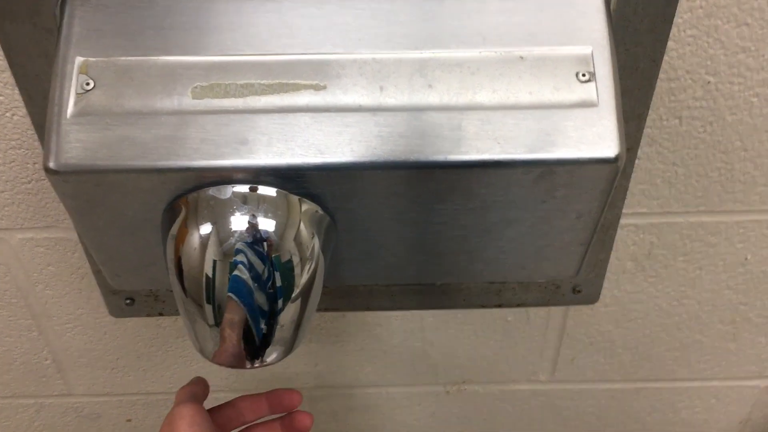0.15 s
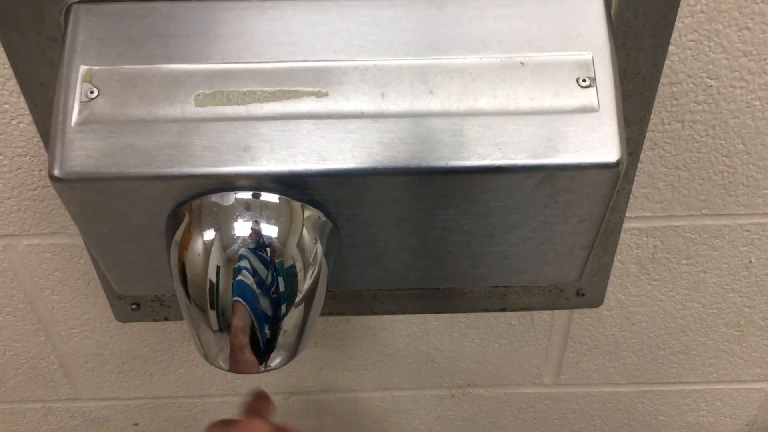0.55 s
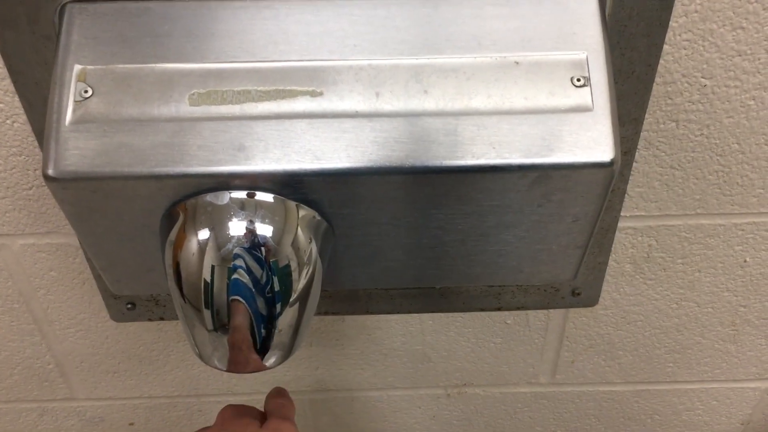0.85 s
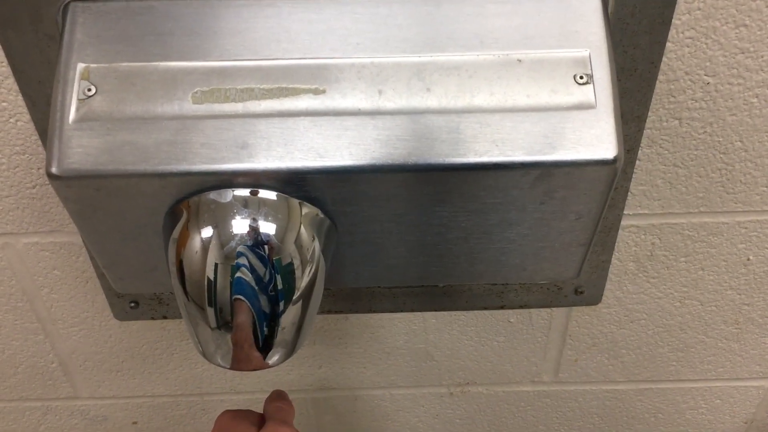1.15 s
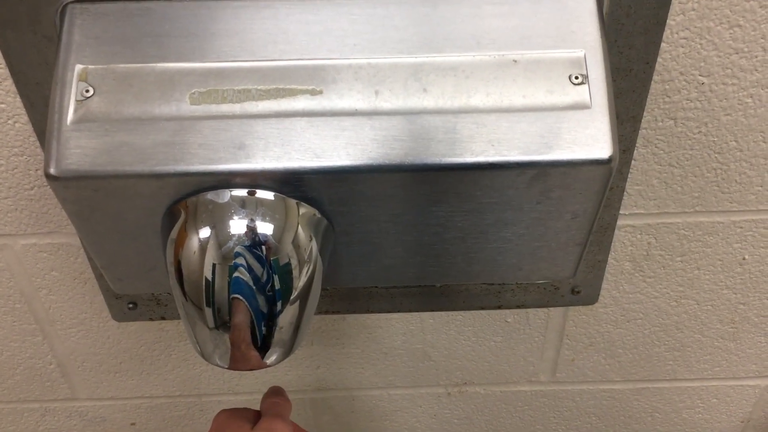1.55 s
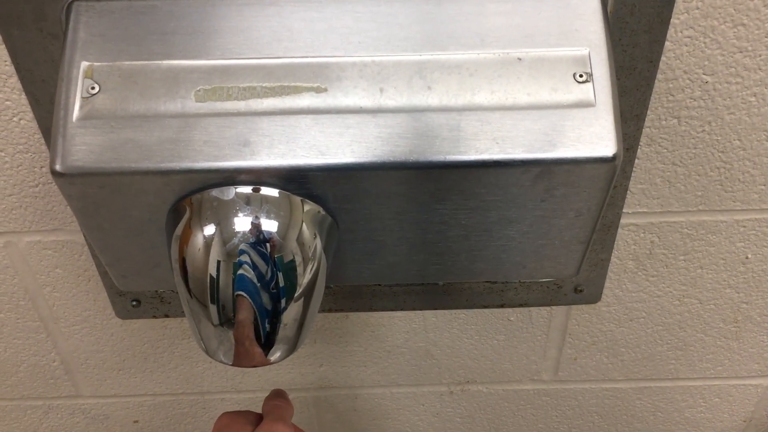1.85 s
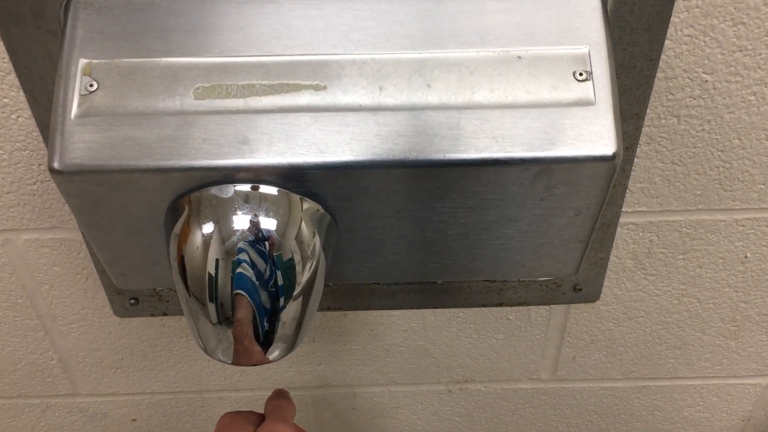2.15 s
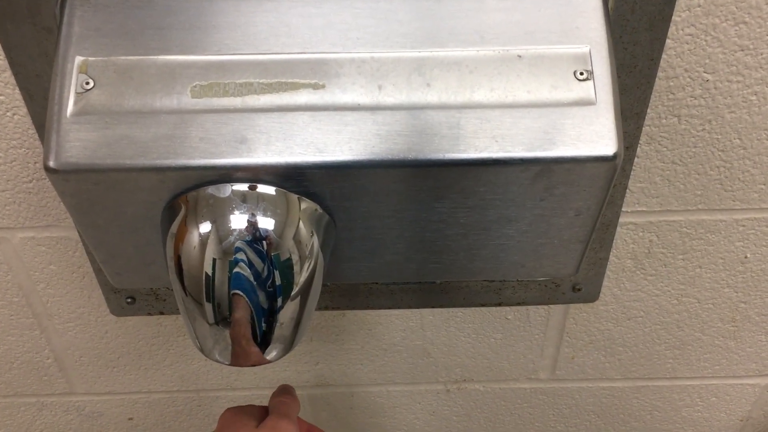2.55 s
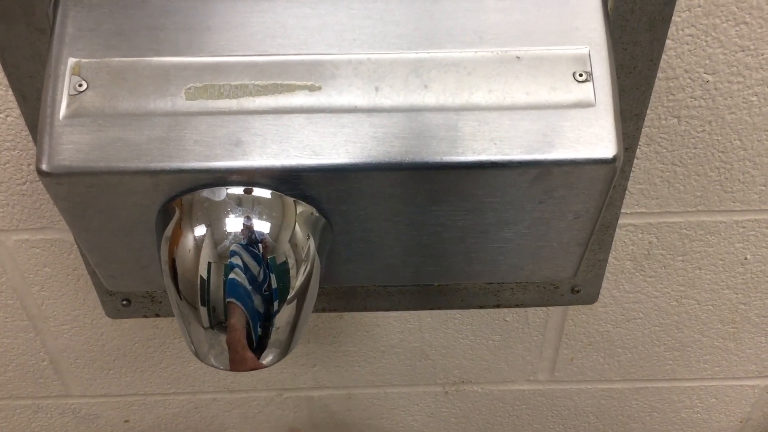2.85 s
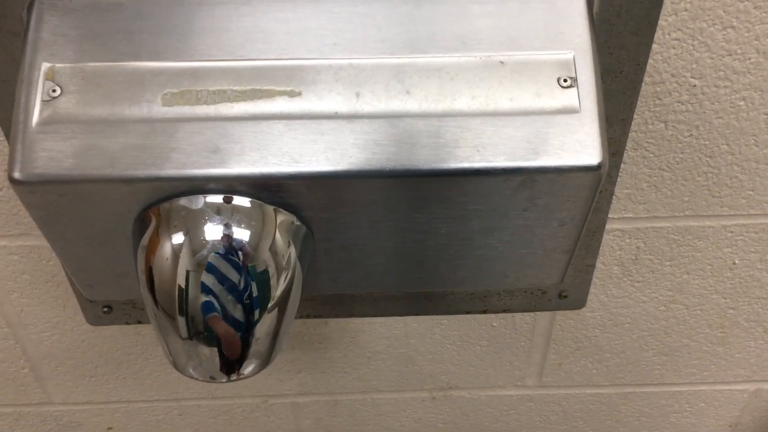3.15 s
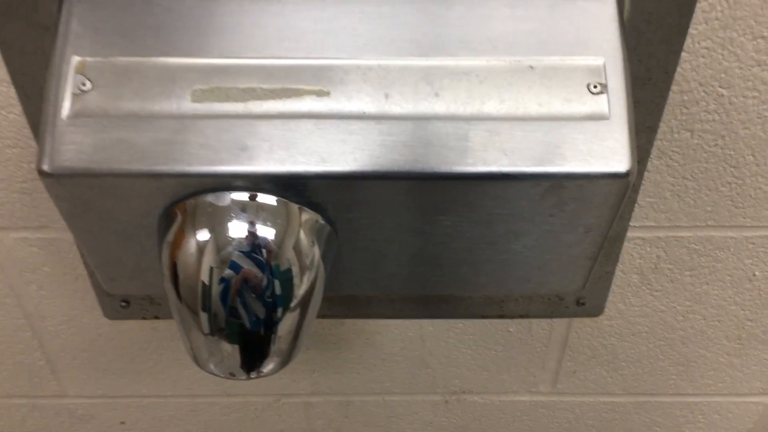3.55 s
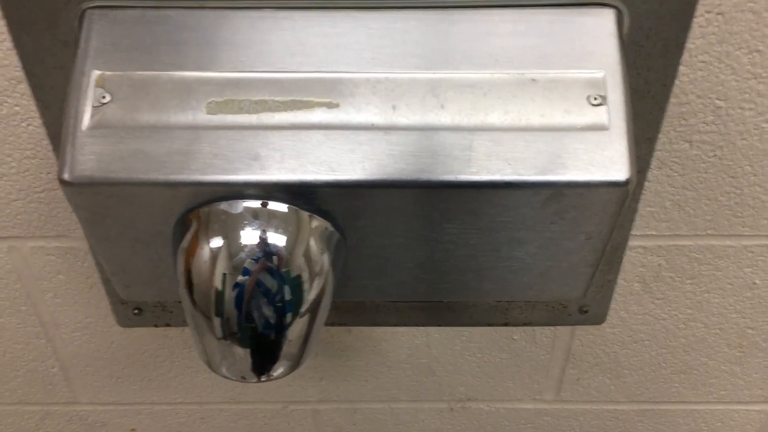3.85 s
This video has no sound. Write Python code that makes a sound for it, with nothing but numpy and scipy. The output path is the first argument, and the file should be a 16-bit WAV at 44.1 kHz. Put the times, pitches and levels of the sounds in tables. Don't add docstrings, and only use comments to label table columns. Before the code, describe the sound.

A wall hand dryer blows a steady, loud rush of air with motor buzz and whine, clicks off after about a second, then coasts down in a hard tiled washroom, recorded close on a phone.

```python
import sys
import numpy as np
from scipy import signal
from scipy.fft import rfft, irfft
from scipy.io import wavfile
from scipy.ndimage import uniform_filter1d

SR = 44100
rng = np.random.default_rng(int(sys.argv[2]) if len(sys.argv) > 2 else 0)


def linear_from_db(decibels):
    return 10 ** (np.asarray(decibels, float) / 20)


def waveform_to_disk(signal):
    frames = np.transpose(np.atleast_2d(signal))
    scaled = np.clip(frames, -1, 1) * 32767
    samples = np.round(scaled).astype(np.int16)
    wavfile.write(sys.argv[1], SR, samples)


N = 176400
OFF_S = .913


def level(x, db):
    return x * linear_from_db(db) / np.sqrt(np.mean(x ** 2))


def on_log(table, hz):
    table = np.array(table)
    return np.interp(np.log(np.maximum(hz, 1)), np.log(table[:, 0]), table[:, 1])


def shaped(x, gain):
    hz = np.arange(len(x) // 2 + 1) * SR / len(x)
    return irfft(rfft(x) * gain(hz), len(x))


def walk(rate):
    k = int(SR / rate)
    steps = np.repeat(rng.standard_normal(N // k + 1), k)
    return 1.3 * uniform_filter1d(uniform_filter1d(steps, k), k)[:N]


def wavering_tones(lines, level_db, level_rate, pitch_spread, pitch_rate):
    out = 0
    for hz, db in lines:
        size = linear_from_db(db + level_db * walk(level_rate))
        pitch = hz * (1 + pitch_spread * walk(pitch_rate))
        out = out + size * np.sin(2 * np.pi * np.cumsum(pitch) / SR)
    return out


# (frequency [Hz], width [Hz], level over
# turbulence [dB])
DRYER_PEAKS = [(42.7, 3, 0), (74.4, 6.6, -12.5), (89, 27, 0), (137.5, 20.5, 10), (185, 32, 5.5),
               (230.3, 52.6, 8.5), (305, 44, 7.5), (342.3, 70, 4), (404, 66, 5), (436.8, 12.3, 1.5),
               (639, 140, 1.5), (748, 93, -1.5), (901, 190, 7), (1039, 75, 9.5), (1157, 120, 3),
              (1357, 98, 10.5), (1475, 124, 9.5), (1766, 170, 7.5), (1905, 45, 6.5), (2130, 52, 0),
              (2256, 124, 6.5), (2420, 54, 10), (2706, 76, 3),
               (3213, 420, 7.5), (3570, 180, 4.5), (3840, 100, 10.5), (4066, 250, 6.5), (4455, 110, 7),
                (5630, 430, 1.5), (6700, 1400, 1.5), (9110, 1870, 6.5), (11740, 2000, 4.5),
                (14300, 2600, 4.5)]


def resonances(hz):
    power = 1
    for f, width, db in DRYER_PEAKS:
        power = power + (linear_from_db(db) / (1 + (2 * (hz - f) / width) ** 2)) ** 2
    return np.sqrt(power)


# (frequency [Hz], level per Hz [dB])
AIR_COLOUR = [(30, -16.5), (60, -9.5), (445, -5), (500, -18), (1900, -14.5), (2700, -24.5), (8000, -32),
              (15500, -45)]
# (frequency [Hz], power of speed [-])
SPEED_POWERS = [(40, 1.2), (130, 1.41), (300, 1.955), (1000, 2.44), (2000, 2.93), (5000, 2.7), (9000, 3.41),
                (14000, 4.7)]


def turbulence(speed):
    air_db, swell_db, flicker_db = -29, 0, 0.52
    out, swell = 0, walk(1.5)
    f = np.arange(N // 2 + 1) * SR / N
    colour = linear_from_db(on_log(AIR_COLOUR, f)) * resonances(f)
    for hz in 31 * 2 ** np.arange(0, 9.5, .5):
        octaves = np.log2(np.maximum(f, 1) / hz)
        mask = np.cos(np.pi * np.clip(octaves, -.5, .5)) * colour
        band = irfft(rfft(rng.standard_normal(N)) * mask, N)
        unsteady = linear_from_db(swell_db * swell + flicker_db * walk(16))
        out = out + band * speed ** on_log(SPEED_POWERS, hz) * unsteady
    return out * linear_from_db(air_db) / np.std(out[:int(OFF_S * SR)])


# (pitch [Hz], rms level [dB])
BLADE_LEVELS = [(830, -72), (920, -62), (1080, -59), (1220, -68), (1400, -47), (1580, -56), (1690, -42),
                (1945, -38)]


def blades(speed):
    full_hz, wobble, flicker_db = 1945, .0007, 1.1
    hz = full_hz * speed * (1 + wobble * walk(10) / speed ** 2)
    size = linear_from_db(on_log(BLADE_LEVELS, full_hz * speed) + flicker_db * walk(14) / speed)
    return np.sqrt(2) * size * np.sin(2 * np.pi * np.cumsum(hz) / SR)


# (frequency [Hz], rms level [dB])
WINDING_TONES = [(120, -54), (344, -46.5), (1152, -53), (1340, -57), (1716, -54), (2240, -60)]


def windings(t):
    tones = wavering_tones(WINDING_TONES, 2.3, 5.2, 0.0025, 7.84)
    t60_s = 0.14
    return np.sqrt(2) * tones * linear_from_db(-60 * np.maximum(t - OFF_S, 0) / t60_s)


# (time [s], level [dB])
HAND_LEVELS = [
    (0, -52),
    (.3, -53),
    (.58, -54),
    (.68, -66),
    (1.0, -83.5),
]


def hand(t):
    centre_hz, width_hz, flutter_db = 7050, 600, 2.0
    hiss = shaped(rng.standard_normal(N), lambda f: 1 / (1 + (2 * (f - centre_hz) / width_hz) ** 2))
    return level(hiss, 0) * linear_from_db(np.interp(t, *np.array(HAND_LEVELS).T) + flutter_db * walk(17))


def washroom(x):
    t60_s, room_db = .35, -13
    u = np.arange(int(.5 * SR)) / SR
    tail = rng.standard_normal(len(u)) * linear_from_db(-60 * u / t60_s) * (u > .003)
    tail = tail / np.sqrt(np.sum(tail ** 2)) * linear_from_db(room_db)
    lead = x[len(u):0:-1]
    echo = signal.fftconvolve(np.concatenate([lead, x]), tail)[len(u):len(u) + N]
    return (x + echo) / np.hypot(1, linear_from_db(room_db))


# (frequency [Hz], level per Hz [dB])
HUM_COLOUR = [(30, -15), (50, 31.5), (140, 6.5), (400, -10), (600, -36), (3000, -61), (9000, -30),
              (15500, -37)]
# (frequency [Hz], peak level [dB])
HUM_TONES = [(45, -58), (91, -56), (135, -54), (244, -56)]


def room_tone():
    tones = wavering_tones(HUM_TONES, 2, 2, .006, 2)
    rumble = shaped(rng.standard_normal(N), lambda f: linear_from_db(on_log(HUM_COLOUR, f)) * resonances(f))
    return level(rumble, -49.5) + tones


def splits(mono):
    count, length_s, width_hz = 18, .03, 1500
    side, n = np.zeros(N), int(length_s * SR)
    for when, where in rng.random((count, 2)):
        i = int(when * (N - 2 * n))
        hz = 4700 * 3.1 ** where ** 2
        band = shaped(mono[i + n:i + 2 * n], lambda f: np.abs(f - hz) < width_hz / 2)
        side[i:i + n] += .65 * band * signal.windows.tukey(n, .5)
    return side


# (time [s], level [dB])
RELAY_HITS = [
    (0.9122, -32),
    (.9160, -32.5),
    (0.918, -32.5),
    (0.921, -33),
    (.9270, -39),
]
# (frequency [Hz], width [Hz], level [dB])
RELAY_BODY = [(4100, 500, 0), (5300, 580, 1), (5960, 400, -0.5), (7600, 410, 1.5), (9400, 770, -10),
              (11400, 600, -2.5), (12200, 250, -4), (13200, 360, -7), (14300, 510, -5), (15300, 500, -9)]


def relay(t):
    snap_t60_s, ring_hz, ring_db, ring_t60_s = 0.018, 12000, -42, .09

    def after(start, t60):
        rise = np.clip((t - start) / 0.00091, 0, 1)
        return (t >= start) * linear_from_db(-60 * np.maximum(t - start, 0) / t60) * rise

    def body(f):
        peaks = sum(linear_from_db(db) / (1 + (2 * (f - hz) / width) ** 2) for hz, width, db in RELAY_BODY)
        return 0.23 * f / (f + 4000) + peaks

    hits = sum(linear_from_db(db) * after(start, snap_t60_s) for start, db in RELAY_HITS)
    crack = level(shaped(rng.standard_normal(N), body), 0) * hits
    ring = shaped(rng.standard_normal(N), lambda f: 1 / (1 + ((f - ring_hz) / 120) ** 2))
    return crack + level(ring, ring_db) * after(RELAY_HITS[0][0], ring_t60_s)


# (time [s], length [s], level [dB])
SLEEVE_RUSTLES = [
    (3.49, .05, -76),
]


def rustles(t):
    noise = level(shaped(rng.standard_normal(N), lambda f: (f / (f + 20000)) ** 2), 0)
    return noise * sum(linear_from_db(db) * np.exp(-((t - s) / length) ** 2) for s, length, db in SLEEVE_RUSTLES)


def scene():
    t = np.arange(N) / SR
    coast_s, coast_power = 1.5, .88
    speed = (1 + np.maximum(t - OFF_S, 0) / coast_s) ** -coast_power
    echoing = washroom(turbulence(speed) + hand(t) + relay(t))
    mono = echoing + blades(speed) + windings(t) + room_tone() + rustles(t)
    return np.array([mono, mono])


def low_pass(x):
    return signal.sosfilt(signal.butter(12, 15730, fs=SR, output="sos"), x)


def record(dry):
    mono = signal.sosfilt(signal.butter(2, 35, "high", fs=SR, output="sos"), dry[0])
    side = splits(mono)
    return low_pass(np.array([mono + side, mono - side]))


dry = scene()
out = record(dry)
waveform_to_disk(out)
```